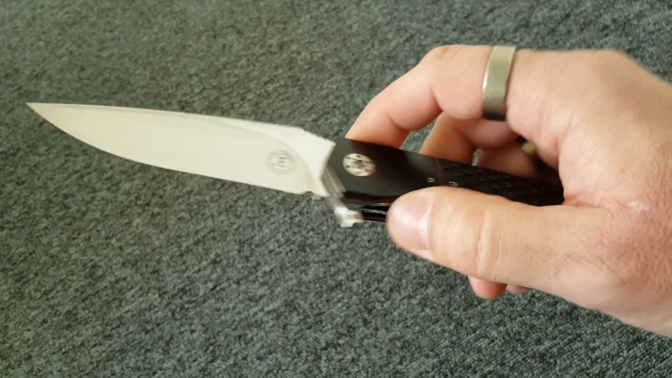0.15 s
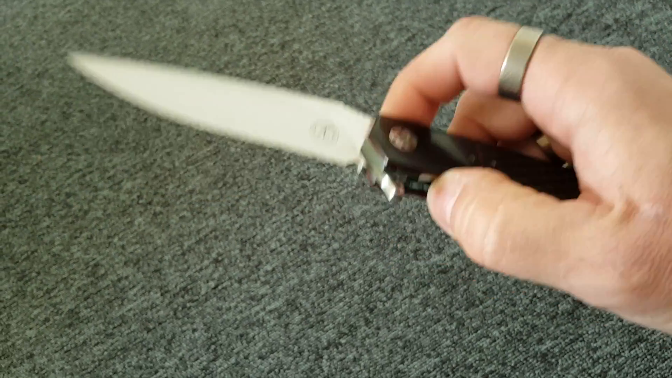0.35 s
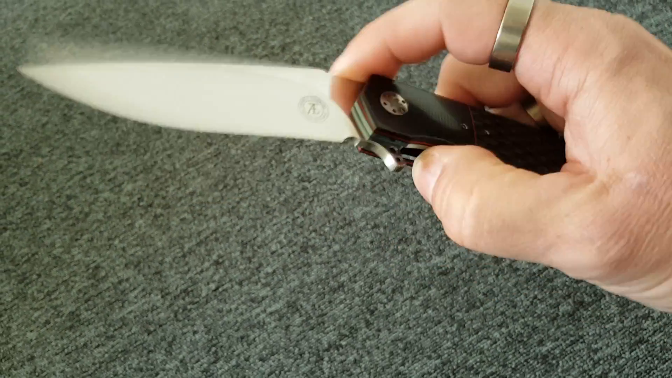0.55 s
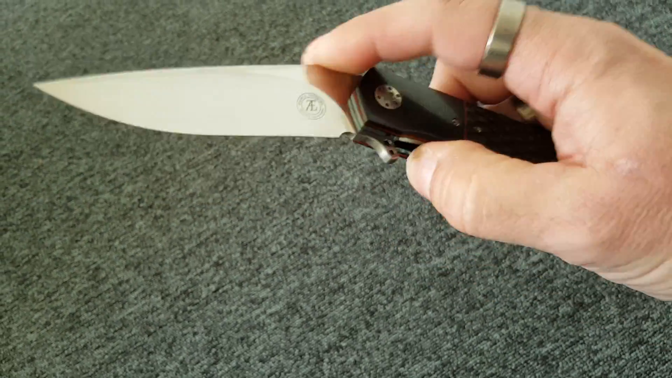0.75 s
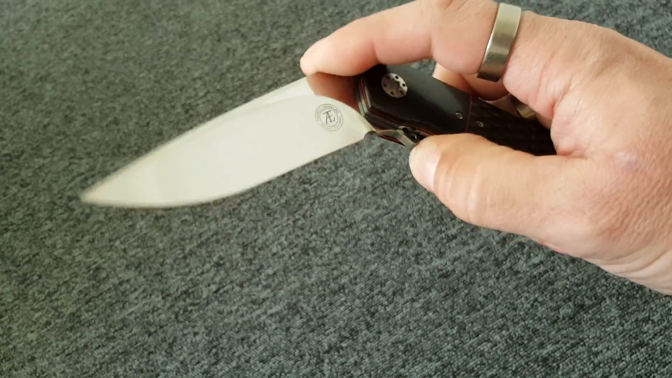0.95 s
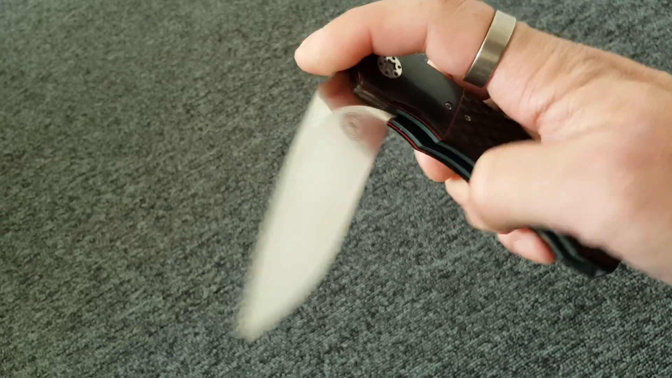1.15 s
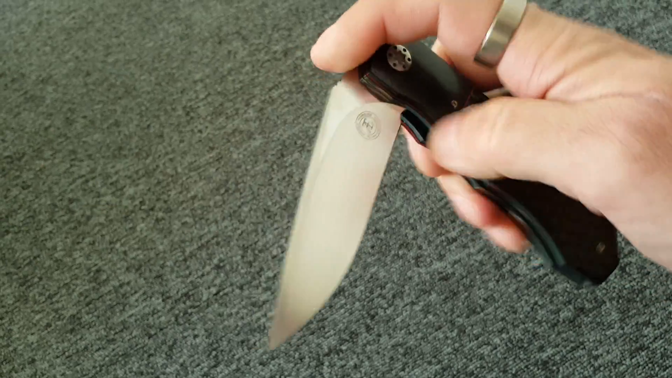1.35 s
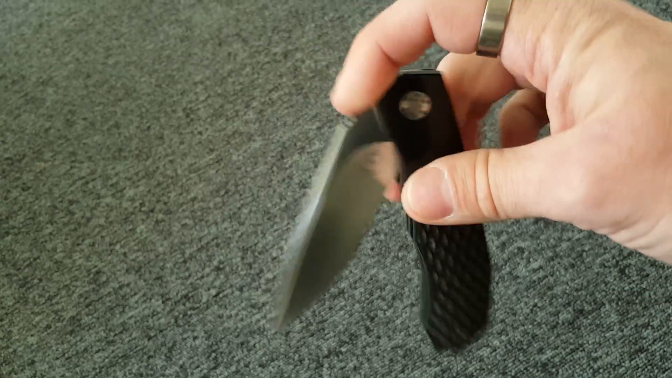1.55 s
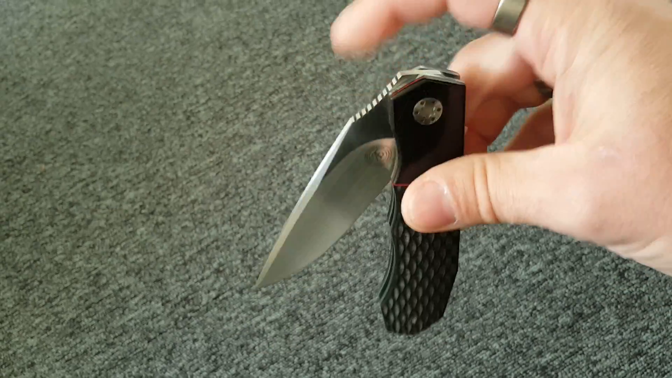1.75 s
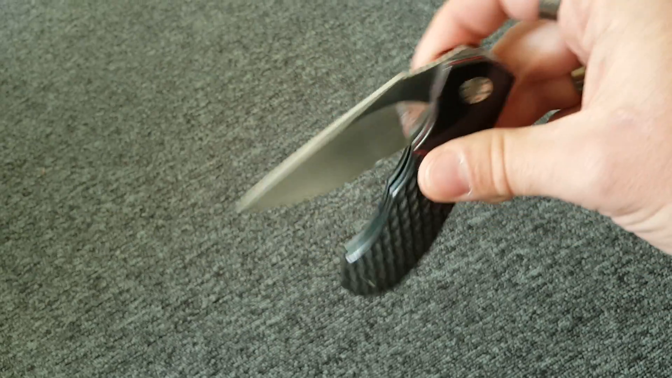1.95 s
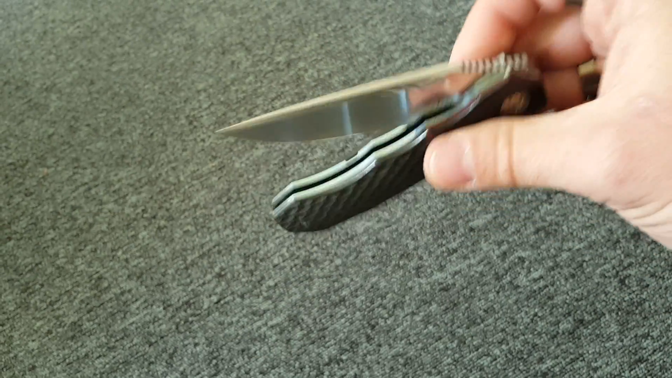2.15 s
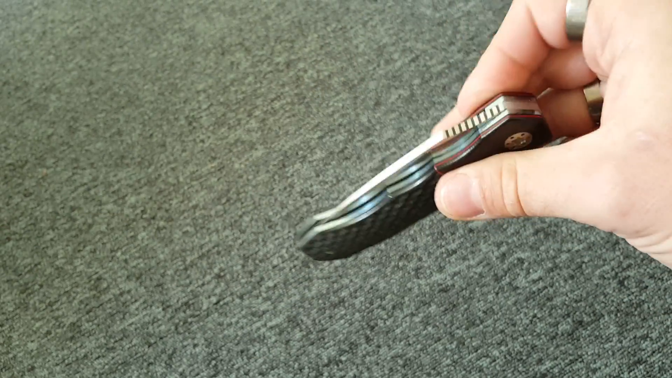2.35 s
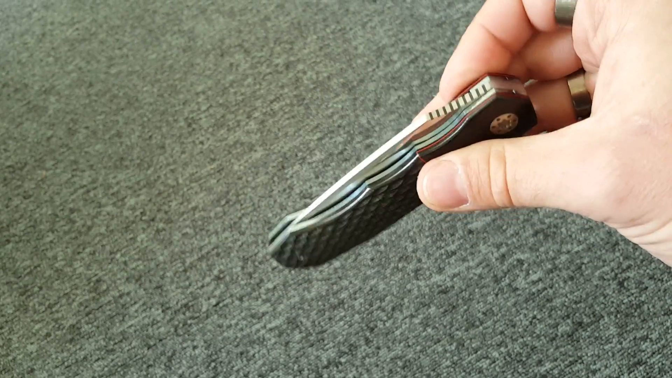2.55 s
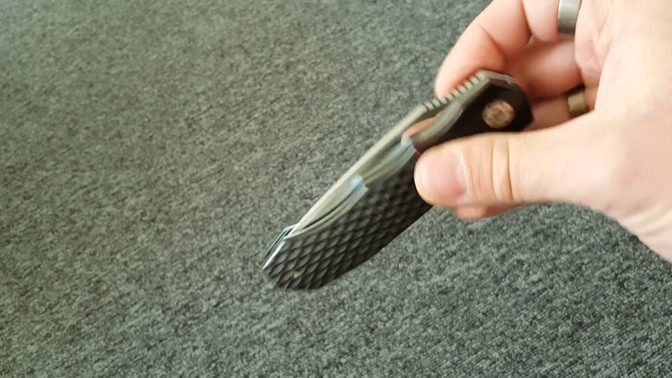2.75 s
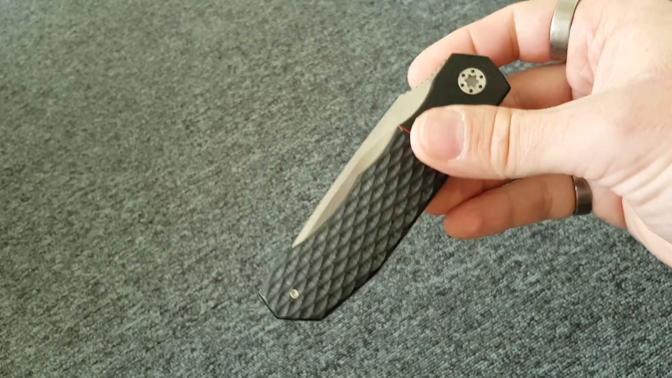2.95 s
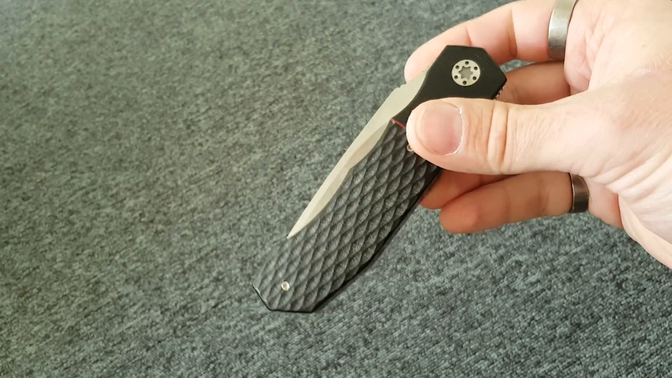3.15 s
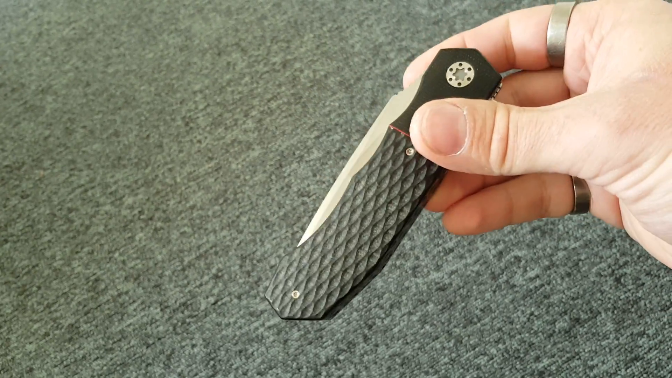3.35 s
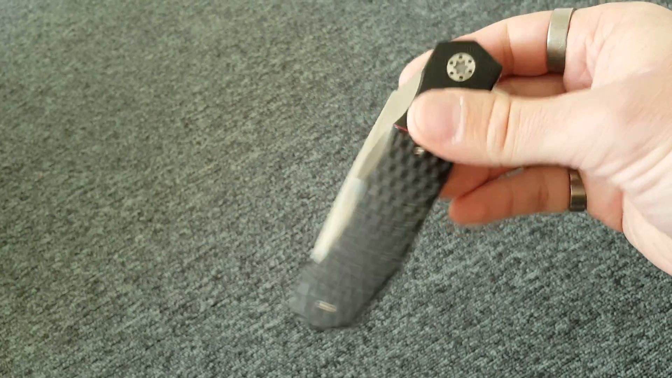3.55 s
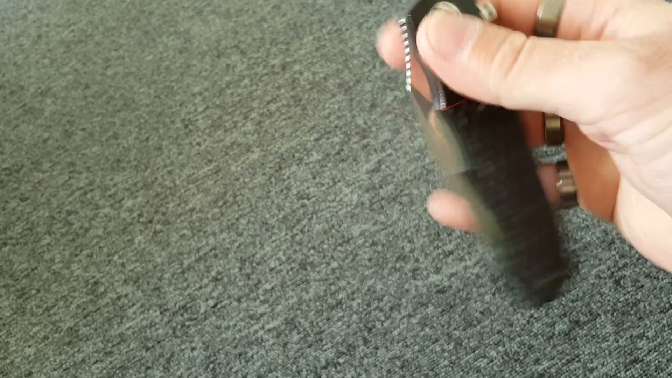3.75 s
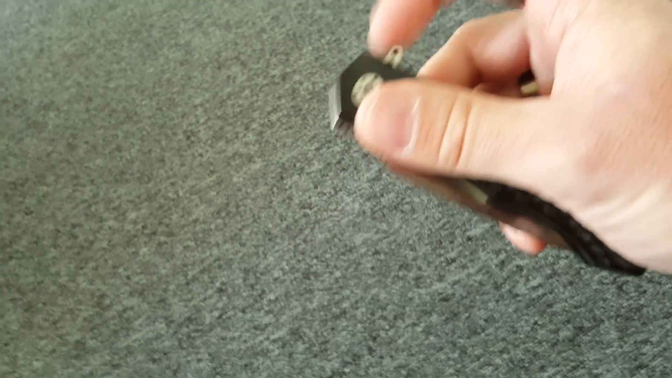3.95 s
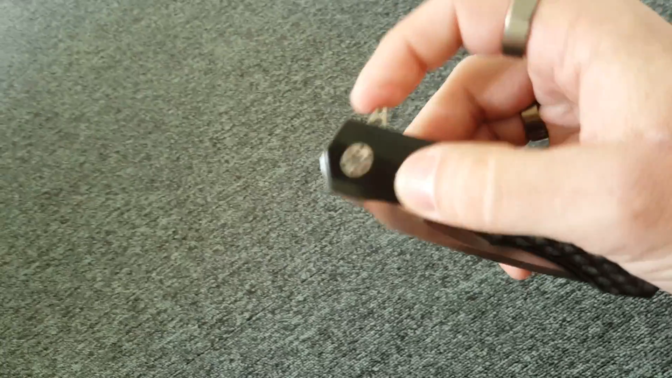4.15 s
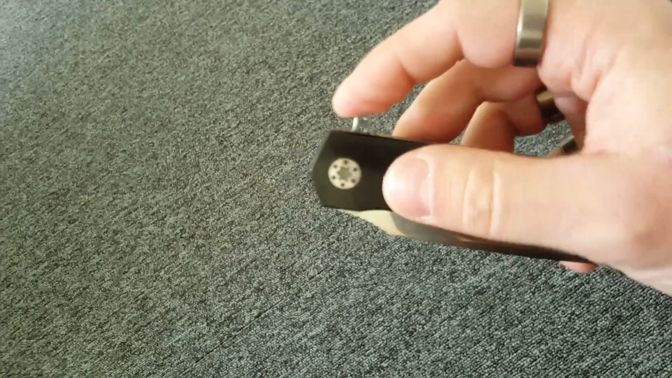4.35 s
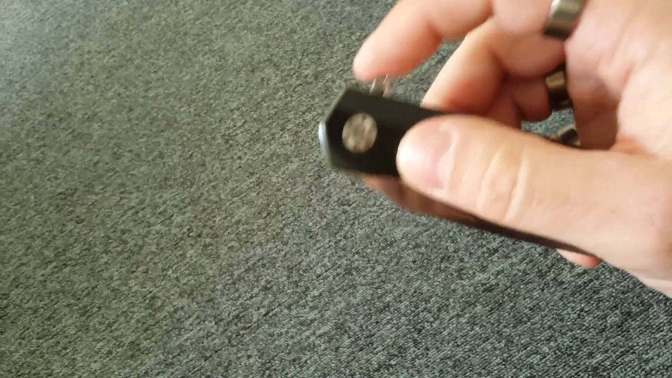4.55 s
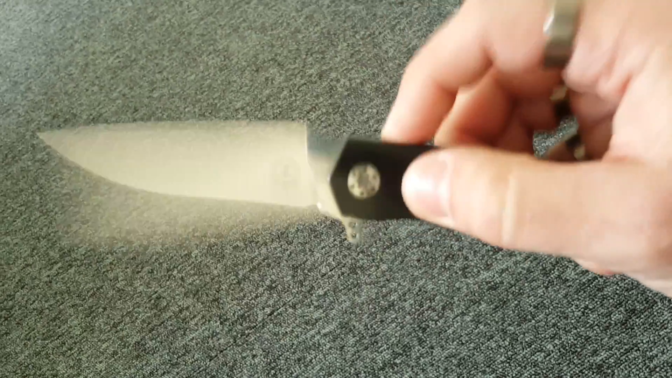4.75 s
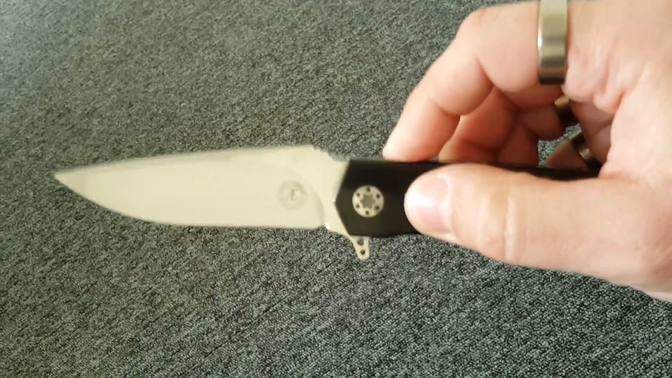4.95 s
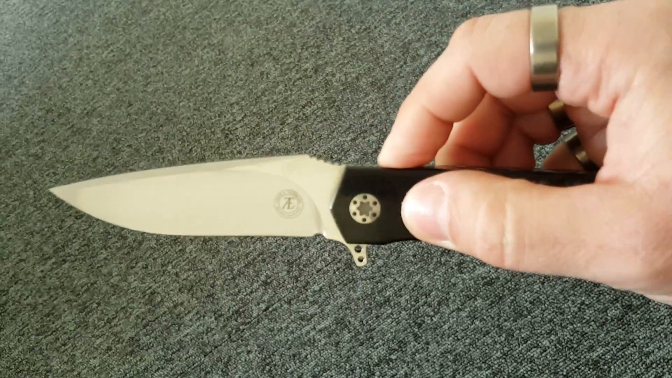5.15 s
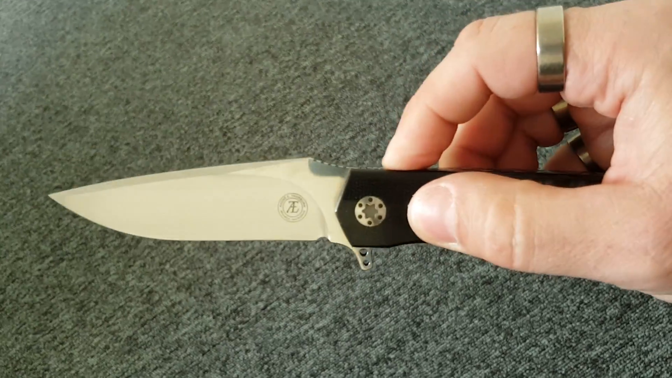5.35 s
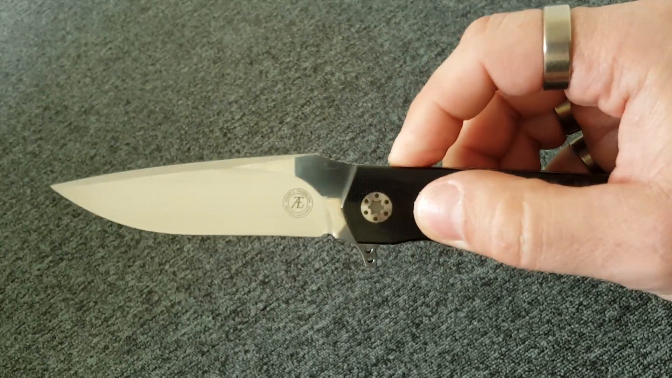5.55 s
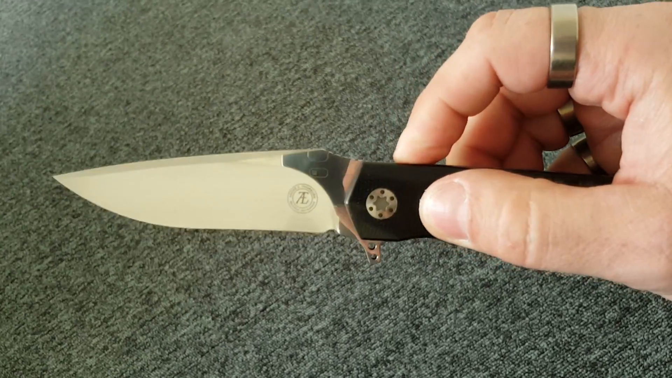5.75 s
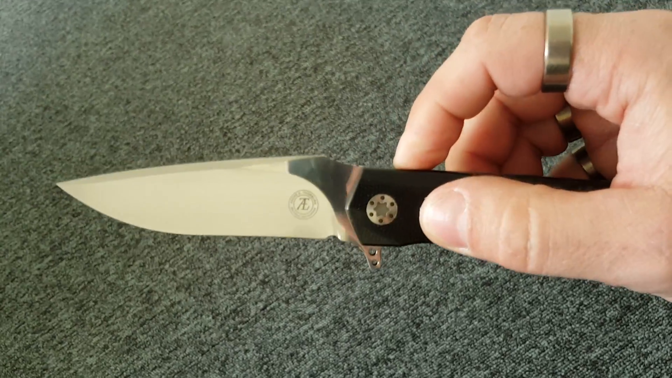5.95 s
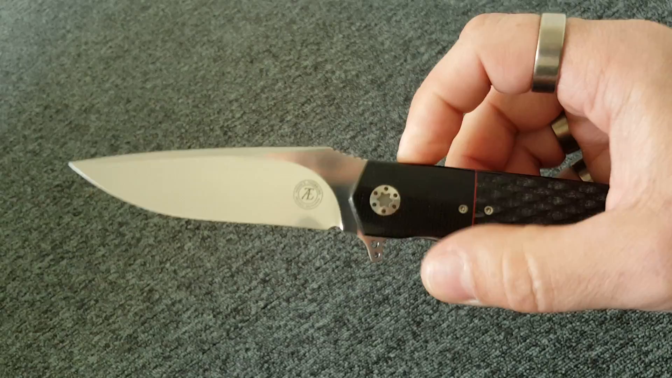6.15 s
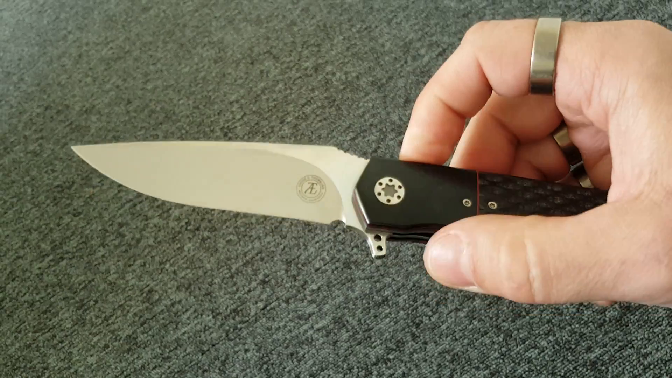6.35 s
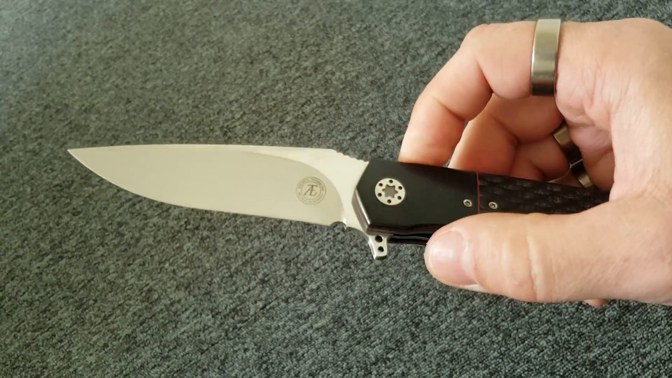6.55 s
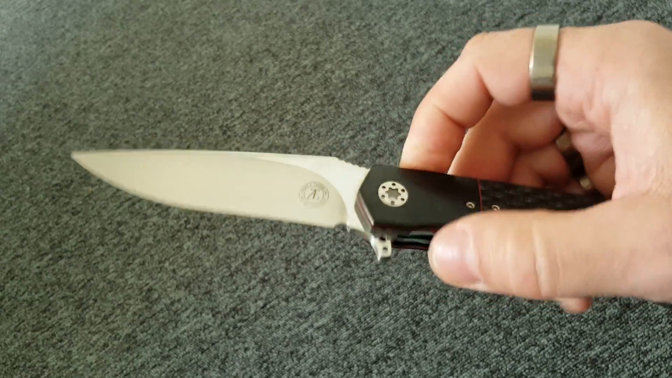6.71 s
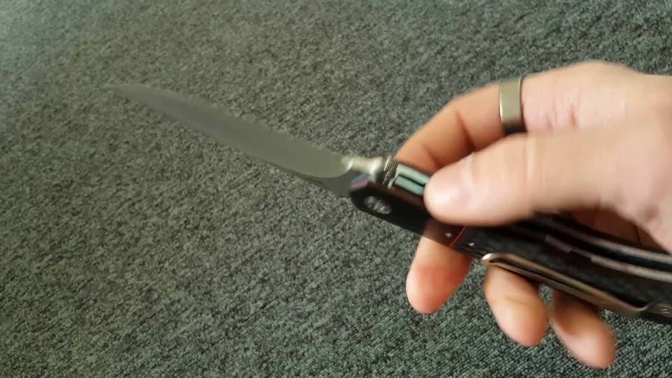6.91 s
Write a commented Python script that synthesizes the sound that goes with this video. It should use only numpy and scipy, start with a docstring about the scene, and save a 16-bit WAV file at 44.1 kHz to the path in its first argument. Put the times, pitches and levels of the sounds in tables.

```python
"""A folding knife is unlocked, closed, turned in the hand and flicked open, close to a pair of phone microphones.
Struck steel rings in many short modes; sliding parts squeak and rustle by micro-slips; skin and grip tick dryly.
A small carpeted room answers with dense noise echoes; behind it lie hissy air and a distant appliance's hum.
The loud opening makes the automatic gain sink and slowly return."""
import sys
import numpy as np
from scipy import signal
from scipy.fft import rfft, irfft
from scipy.io import wavfile
from scipy.ndimage import uniform_filter1d, minimum_filter1d

SR = 44100
rng = np.random.default_rng(int(sys.argv[2]) if len(sys.argv) > 2 else 0)


def generate_wav(signal):
    """Clip the signal to [-1, 1] and save it as 16-bit WAV at the path in sys.argv[1]."""
    frames = np.transpose(np.atleast_2d(signal))
    scaled = np.clip(frames, -1, 1) * 32767
    pcm = np.round(scaled).astype(np.int16)
    wavfile.write(sys.argv[1], SR, pcm)


def decibels_to_gain(level_db):
    """Convert a level in decibels to a linear amplitude gain (20 dB per decade)."""
    exponent = np.asarray(level_db, float) / 20
    return 10 ** exponent


N = 312228

# room air and microphone hiss, shape only: [f/Hz, relative density/dB]
AIR_SPECTRUM = [(9, -36.5), (15, -5.5), (59, -1.3), (138, -9), (240, -8.5), (344, -15.5), (461, -19.5),
                (653, -20), (900, -24), (1550, -29), (3000, -38), (6000, -47), (10500, -51), (13500, -47.5),
                (16000, -47.5)]
# likeness of the air noise at the two microphones: [f/Hz, correlation]
AIR_LIKENESS = [(60, 0.941), (130, 0.91), (290, 0.81), (640, 0.36), (1410, 0.043), (3100, 0.051),
                (6820, -0.084), (15000, 0.24)]
# distant appliance: [f/Hz, width of each of two resonances/Hz, rms level before panning/dB, steady share 0-1]
HUM_TONES = [(37.4, 27, -64.5, 0.2), (67.3, 10, -57, 0.6), (119.7, 27, -57.5, 0), (181.4, 8, -51.5, 0.2),
             (292.9, 1.3, -56, 0.86), (647.7, 98, -68.5, 0.01)]
# decay of the room tail: [f/Hz, t60/s]
ROOM_T60 = [(500, 0.1), (2000, 0.56), (3300, 0.6), (4700, .6), (6500, 0.5), (8500, 0.36), (12000, 0.45),
            (16000, 0)]
# colour of the room echoes: [f/Hz, relative level/dB]
ROOM_COLOUR = [(500, -30), (1500, -25.5), (2500, -18.5), (3500, -18.5), (4700, -18), (6000, -19.5),
               (8500, -21.5), (12000, -27.5), (16000, -28)]
# parts sliding: [t of the hardest rub/s, length/s, squeak f/Hz, squeak rms level at full pressure/dB, rustle same/dB]
SLIDES = [(.086, 0.15, 3650, -69, -70), (.579, .025, 3900, -56, -70), (.86, .08, 3650, -66, -74),
          (1.054, .028, 3620, -49, -66), (1.156, .09, 3670, -62.5, -78), (1.367, .07, 3620, -65, -82),
          (1.454, .09, 3580, -72, -80), (1.514, 0.12, 3800, -70, -71), (1.618, 0.13, 3670, -73.5, -78),
          (2.356, 0.17, 3700, -64.5, -84), (3.74, 0.15, 3520, -73.5, -85), (3.809, .12, 3450, -69, -82),
          (3.86, 0.057, 3350, -61.5, -65.5), (3.898, .04, 3630, -63, -63.5), (4.25, .14, 3300, -71.5, -73),
          (4.356, .07, 3580, -60, -74), (4.429, 0.023, 3540, -65, -85), (4.737, .04, 3650, -55.5, -76),
          (4.756, 0.044, 3900, -53, -57), (4.781, 0.054, 4170, -52.5, -60.5),
          (6.807, .02, 3798, -62, -67.5), (6.85, 0.21, 3650, -84, -76)]
# resonances of the squeak, moved with each slide's pitch: [f/Hz, width of each of two passes/Hz, relative level/dB]
SQUEAK = [(3226, 300, -5.5), (3650, 430, 5.5), (4150, 500, -5)]
# resonances of the rustle: [f/Hz, width of each of two passes/Hz, relative level/dB]
RUSTLE = [(5200, 790, -7), (6850, 310, 2.5), (8300, 850, -3.5), (9400, 790, 0), (10415, 1200, -8.5),
          (12500, 600, -3), (14000, 2000, -8)]
# dry ticks of skin, rings and grip, and a few brief narrow-band squeaks: [t/s, peak level before panning/dB,
# lowest f/Hz, highest f/Hz]
TICKS = [(.203, -54, 3700, 4000), (.4905, -45, 1190, 7650), (.531, -51, 1220, 3500),
         (.71, -52, 3000, 13000), (.758, -53, 1800, 4000), (.793, -53, 2500, 14000),
         (.856, -56, 3020, 14000), (1.055, -45, 1050, 1700), (1.056, -41, 1500, 12220),
         (1.907, -53, 2000, 13240), (3.642, -57, 9080, 14000), (3.791, -50, 3100, 4000),
         (3.823, -50, 3100, 4200), (3.886, -42, 7400, 14570), (3.995, -56.5, 9550, 14000),
         (4.02, -57, 4000, 7000), (4.04, -61, 6916, 13000), (4.093, -21.5, 2900, 13500),
         (4.7555, -42, 1200, 2600), (4.758, -36, 3300, 4736), (6.063, -55, 3000, 5000),
         (6.33, -59, 5000, 12900), (6.809, -46.5, 3458, 4300), (6.81, -48.5, 8487, 15540)]
# where the fingers work: [t/s, left over right level/dB]
HAND_PAN = [(0, 1.5), (1.0, 4), (1.9, 8), (3.6, -3), (4.8, -4), (6.0, 0)]
# parts of the knife that are struck: lock bar, detent, stop pin
PARTS = ("lock bar", "detent", "stop pin")
# steel on steel: [t/s, push level/dB, part struck, level lost at each rebound/dB]
BLOWS = [(0.597, -24.5, "lock bar", 10.5), (0.612, -48, "lock bar", 9.5), (2.3926, -14.5, "detent", 5),
         (2.3957, -24, "detent", 9), (2.402, -16, "detent", 6), (2.41, -31, "detent", 8),
         (4.8041, -18.5, "stop pin", 12), (4.8066, -25.5, "stop pin", 7), (4.8113, -15, "stop pin", 9.5),
         (4.8127, -5, "stop pin", 8.5)]
# how freely each part radiates past the hand, in the order of PARTS: [level/dB]
OPENNESS = [-10, -6, 3]
# the flat of the blade ringing towards the walls, one row per part: [f/Hz, width of each of two passes/Hz, level/dB]
BLADE_RING = [(4400, 1200, 8), (4800, 900, 16), (4690, 360, 26)]
# knife modes: [f/Hz, t60/s, lag of the right side/rad, relative level for lock bar/dB, detent/dB, stop pin/dB]
KNIFE_MODES = [(334, 0.01, .1, -32, -22.5, -20), (601.8, 0.01188, .3, -35, -18.5, -17),
               (1170, 0.009, 0.61, -26, -19, -17), (1546, .010, .9, -15, -7, -11),
               (2000, 0.0054, 0.61, -27, -9, -10), (2600, 0.0069, 0.65, -35, -4.5, -7),
               (3240, 0.02, 1.2, -41.5, -2, -1), (3580, .014, 1.2, -14, 0.5, -0.45),
               (3900, .013, 2.1, 3.5, -3, -2), (4150, .012, 1.6, -2, -13, -1.5),
               (4550, 0.007, 2, 2, -8, -2), (4760, .022, 2.3, -16, -9, -3), (5130, 0.0095, 1.3, -9, -5, -4),
               (6282, .012, .8, -13, -7.5, -8), (6870, .02, .8, -19, -13, -10),
               (7570, 0.0055, 1.1, -14, -11, -11), (8456, .09, 1.1, -27, -25, -18),
               (9370, .01, 1.8, -7, -13, -13), (10050, 0.012, 0.9, -14, -19.5, -16.5),
               (11310, 0.004, 1.6, -5, -13.5, -23.5), (11714, .04, 1.4, -8, -26, -33),
               (12500, .012, 2.5, -7, -15, -21), (13500, .008, 1.8, -24.5, -18, -22),
               (14400, .008, 1.4, -14.5, -19.5, -19.5), (15400, .008, 1.4, -27.5, -18.5, -25)]
# side on which the modes are heard: [f/Hz, left over right level/dB]
KNIFE_PAN = [(60, 7.5), (240, 9.5), (950, 7), (3770, 0), (15000, 0.5)]


def rms_one(x):
    """Scale to rms 1."""
    return x / np.sqrt(np.mean(x ** 2) + 1e-20)


def at_hz(points, hz):
    """Read a table on a log-frequency axis."""
    table_hz, values = np.array(points).T
    return np.interp(np.log(hz), np.log(table_hz), values)


def left_right(pan_db):
    """Gains of a left-right pair, the level difference split evenly."""
    return decibels_to_gain(np.array([[pan_db / 2], [-pan_db / 2]]))


def ring(push, hz, t60, lag):
    """A decaying cosine per unit push, its phase lagging by some radians."""
    r, w = decibels_to_gain(-60 / (t60 * SR)), 2 * np.pi * hz / SR
    return signal.lfilter([np.cos(lag), -r * np.cos(w + lag)], [1, -2 * r * np.cos(w), r * r], push + 1e-18)


def resonance(x, hz, width_hz):
    """Band-pass with gain 1 on top."""
    r = np.exp(-np.pi * width_hz / SR)
    feedback = [1, -2 * r * np.cos(2 * np.pi * hz / SR), r * r]
    return signal.lfilter(np.array([1, 0, -1]) * (1 - r * r) / 2, feedback, x)


def double_resonance(x, hz, width_hz):
    """The same band-pass twice, for steeper skirts."""
    return resonance(resonance(x, hz, width_hz), hz, width_hz)


def air():
    """Steady coloured noise of room and microphones, most alike on both sides in the bass."""
    level_db = -50   # rms
    hz = np.maximum(np.fft.rfftfreq(N, 1 / SR), 1)
    mid, side = rfft(rng.standard_normal((2, N))) * decibels_to_gain(at_hz(AIR_SPECTRUM, hz))
    alike = at_hz(AIR_LIKENESS, hz)
    pair = np.sqrt(1 + alike) * mid + np.sqrt(1 - alike) * side * [[1], [-1]]
    return decibels_to_gain(level_db) * rms_one(irfft(pair, N))


def hum():
    """Each appliance tone is part steady sine, part noise swelling in a narrow resonance."""
    t, out = np.arange(N) / SR, 0
    noise = rng.standard_normal((len(HUM_TONES), N + SR))
    for (hz, width_hz, level_db, steady), white in zip(HUM_TONES, noise):
        wavering = rms_one(double_resonance(white, hz, width_hz)[SR:])   # skip the filter's onset
        sine = np.sqrt(2) * np.sin(2 * np.pi * hz * t)
        out = out + decibels_to_gain(level_db) * (np.sqrt(steady) * sine + np.sqrt(1 - steady) * wavering)
    return out * left_right(-1.04)


def room(x):
    """Dense echoes, unrelated on the two sides: a quick early cluster and a tail that dies band by band."""
    first_echo_s, early_t60_s, early_db = 0.0059, 0.11, 9.5   # early level is over the tail
    t, echoes = np.arange(SR * 7 // 10) / SR, 0
    edges = 350 * 2 ** (np.arange(18) / 3)   # third octaves
    white = rng.standard_normal((2, 2, len(t)))   # neighbouring bands get unrelated noise
    for k, (low, high) in enumerate(zip(edges, edges[1:])):
        hz = np.sqrt(low * high)
        sos = signal.butter(2, [low, high], "band", fs=SR, output="sos")
        band = signal.sosfilt(sos, white[k % 2])
        tail = decibels_to_gain(-60 * t / at_hz(ROOM_T60, hz))
        early = decibels_to_gain(early_db - 60 * t / early_t60_s)
        echoes = echoes + decibels_to_gain(at_hz(ROOM_COLOUR, hz) - 18.5) * band * (tail + early)
    echoes = echoes * np.clip(t / first_echo_s - 1, 0, 1)   # silent first, then fading in
    return signal.fftconvolve(x, echoes, axes=1)[:, :N]


def slides():
    """Dense uneven micro-slips excite a low squeak and a bright rustle of the steel; pressure swells and eases."""
    slips_per_s, slip_spread_db = 2000, 3.0
    rise_share, fade_db = .4, 15.5   # share of a slide spent rising; depth under its top at start and end
    reach = SR // 4   # samples computed either side of the hardest rub
    t = np.arange(-reach, reach) / SR
    out = np.zeros((2, N + 2 * SR))   # a second of margin at both ends
    for s, length, squeak_hz, squeak_db, rustle_db in SLIDES:
        chance, size, sign = rng.random((3, 2, 2 * reach))
        slip_size = decibels_to_gain(-slip_spread_db * np.log(1 - size))
        slips = (chance < slips_per_s / SR) * slip_size * np.sign(sign - .5)
        pressure_db = -fade_db * np.maximum(-t / rise_share, t / (1 - rise_share)) / length
        start = SR + round(s * SR) - reach
        squeak_tune = squeak_hz / SQUEAK[1][0]   # the middle resonance lands on the squeak pitch
        for top_db, body, tune in ((squeak_db, SQUEAK, squeak_tune), (rustle_db, RUSTLE, 1)):
            rung = sum(decibels_to_gain(db) * double_resonance(slips, hz * tune, width) for hz, width, db in body)
            out[:, start:start + 2 * reach] += decibels_to_gain(top_db + pressure_db) * rms_one(rung)
    return out[:, SR:SR + N]


def ticks():
    """A tick is a single snap with a faint gritty afterslip, heard through its own band."""
    length = 400   # samples
    out, t_ms = np.zeros((2, N)), np.arange(length) * 1000 / SR
    grits = rng.standard_normal((len(TICKS), 2, length))
    for (s, peak_db, low_hz, high_hz), grit in zip(TICKS, grits):
        snap = (t_ms == 0) + decibels_to_gain(-17.0) * grit * np.exp(-t_ms / 1.2)
        sos = signal.butter(2, [low_hz, high_hz], "band", fs=SR, output="sos")
        snap = signal.sosfilt(sos, snap)
        snap = snap / np.abs(snap).max() * decibels_to_gain(peak_db)
        start = round(s * SR)
        out[:, start:start + length] += snap * left_right(np.interp(s, *np.transpose(HAND_PAN)))
    return out


def contacts():
    """One sharp push per contact and two rebounds, on the track of the part that is struck."""
    rebound_s = .00104
    push = np.zeros((len(PARTS), N))
    for s, level_db, part, loss_db in BLOWS:
        for k in range(3):
            push[PARTS.index(part), round((s + k * rebound_s) * SR)] += decibels_to_gain(level_db - k * loss_db)
    return push


def bursts(push):
    """At a distance, contacts a few milliseconds apart blur into one push with their joint energy."""
    blur = 309   # samples, 7 ms
    loudest = push >= -minimum_filter1d(-push, size=blur, axis=1)
    energy = uniform_filter1d(push ** 2, size=blur, axis=1) * blur
    joint = np.sqrt(np.abs(energy))   # abs guards against rounding below zero
    return (push > 0) * loudest * joint * decibels_to_gain(np.array(OPENNESS))[:, None]


def blade_ring(far):
    """The flat of the blade resonates towards the walls, tuned by the part struck."""
    return sum(decibels_to_gain(db) * double_resonance(track, hz, width)
               for track, (hz, width, db) in zip(far, BLADE_RING))


def knife_blows(push):
    """Pushes ring all modes, neighbours in opposite phase, plus a bare crack that is later on the right."""
    crack = decibels_to_gain(1.0) * np.diff(push.sum(axis=0), prepend=0)
    out = np.array([crack, np.roll(crack, 3)])   # 3 samples later
    for k, (hz, t60, lag, *part_db) in enumerate(KNIFE_MODES):
        drive = (-1) ** k * decibels_to_gain(np.array(part_db)) @ push
        pan = decibels_to_gain(at_hz(KNIFE_PAN, hz) / 2)
        out += [pan * ring(drive, hz, t60, -lag / 2), ring(drive, hz, t60, lag / 2) / pan]
    return out


def scene():
    """The knife, its echoes and the quiet room; the walls hear the blows from all sides, so less coloured."""
    push = contacts()
    hand = ticks() + slides()
    far = bursts(push)
    bare = decibels_to_gain(11.0) * far.sum(axis=0)
    to_walls = decibels_to_gain(-13) * knife_blows(far) + bare + blade_ring(far) + decibels_to_gain(-17) * hand
    return knife_blows(push) + hand + room(to_walls) + air() + hum()


def low_pass(x):
    """Removes everything above the highest recorded frequency."""
    return signal.sosfilt(signal.butter(12, 16290, fs=SR, output="sos"), x)


def record(dry):
    """Loud peaks pull the gain down; it holds, then climbs back. Overload is clipped, the top treble cut."""
    threshold_db, slope = -20.5, 0.73   # slope: dB taken per dB over the threshold
    hold_s, return_db_per_s, smooth_s = 0.53, 17, .07
    t = np.arange(N) / SR
    power = uniform_filter1d(np.mean(dry ** 2, axis=0), size=441)   # over 10 ms
    level_db = 10 * np.log10(power + 1e-12)
    over_db = np.maximum(level_db - threshold_db, 0) * slope
    hold = round(hold_s * SR)
    held_db = -minimum_filter1d(-over_db, size=hold, origin=(hold - 1) // 2)
    cut_db = np.maximum.accumulate(held_db + return_db_per_s * t) - return_db_per_s * t
    r = np.exp(-1 / (smooth_s * SR))
    cut_db = signal.lfilter([1 - r], [1, -r], cut_db)
    clipped = np.clip(dry * decibels_to_gain(-cut_db), -1, 1)
    top_cut = signal.cheby2(10, 50, 17000, fs=SR, output="sos")   # 50 dB down from 17 kHz
    mix = signal.sosfilt(top_cut, clipped)
    return low_pass(mix)


dry = scene()
out = record(dry)
generate_wav(out)
```